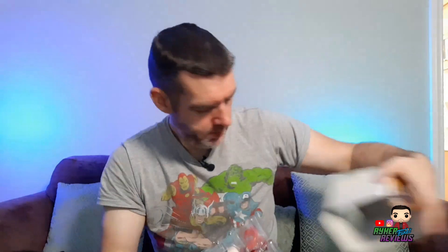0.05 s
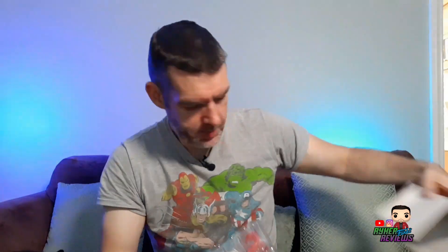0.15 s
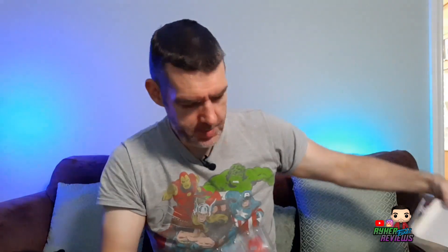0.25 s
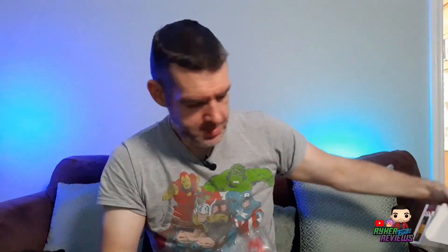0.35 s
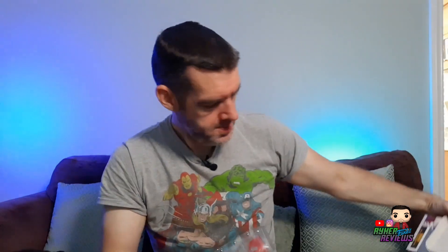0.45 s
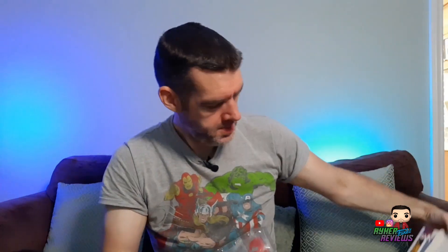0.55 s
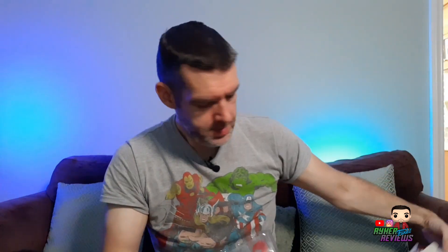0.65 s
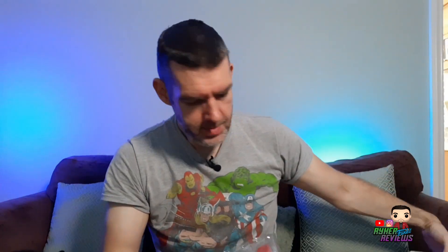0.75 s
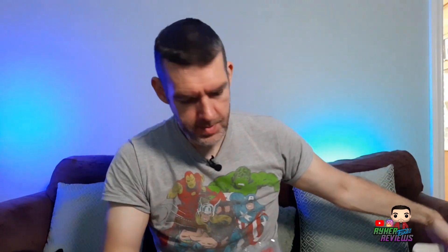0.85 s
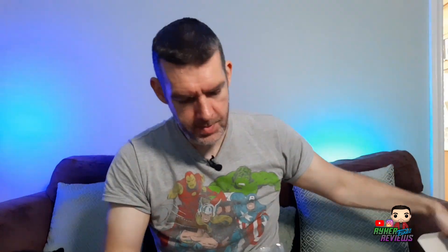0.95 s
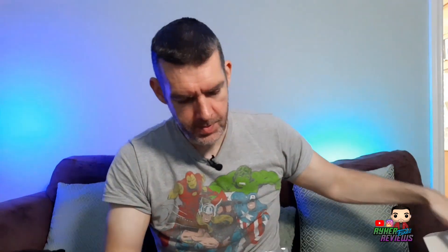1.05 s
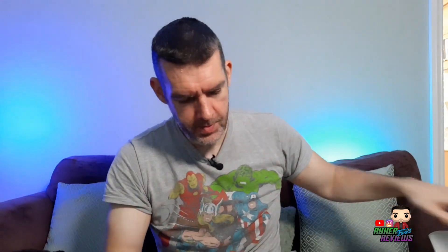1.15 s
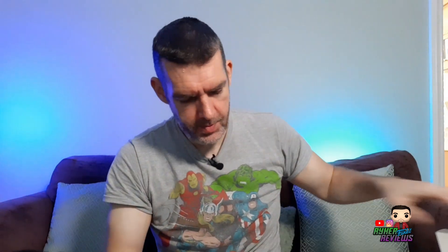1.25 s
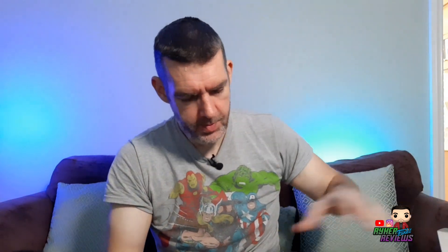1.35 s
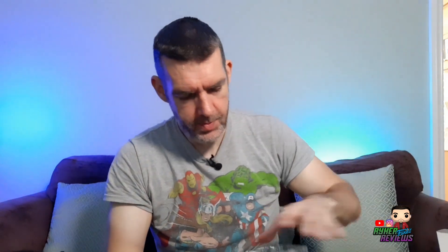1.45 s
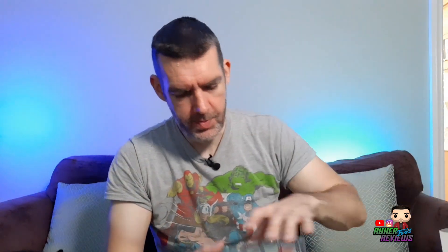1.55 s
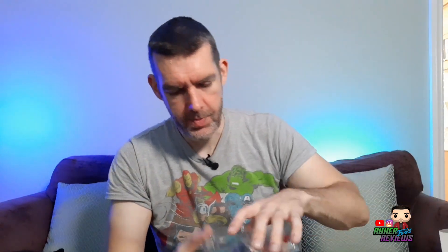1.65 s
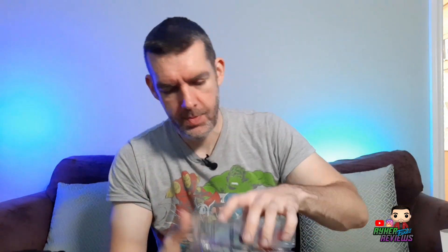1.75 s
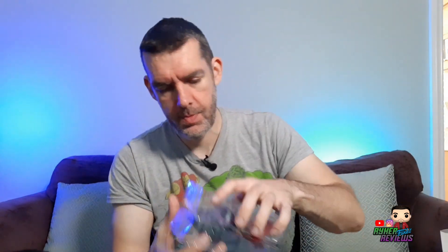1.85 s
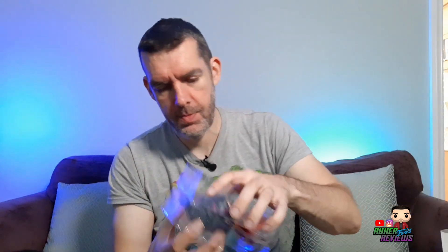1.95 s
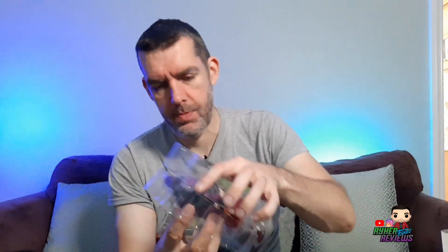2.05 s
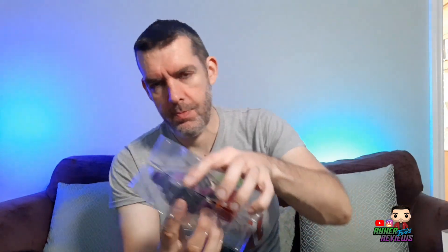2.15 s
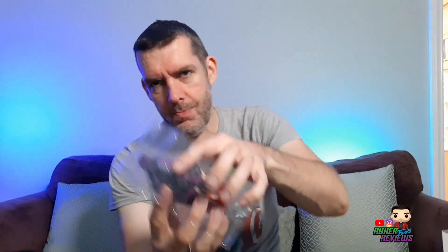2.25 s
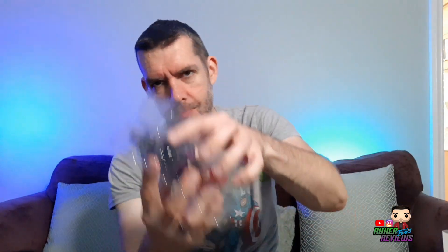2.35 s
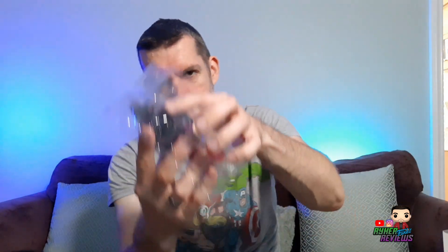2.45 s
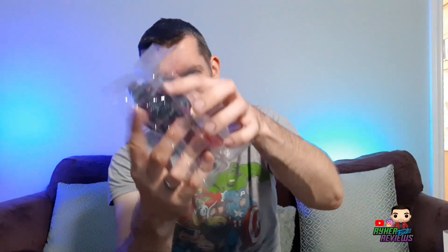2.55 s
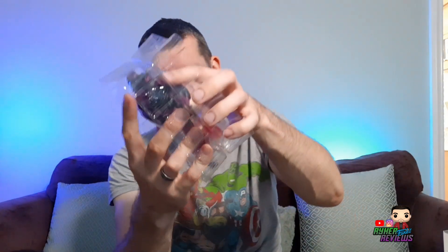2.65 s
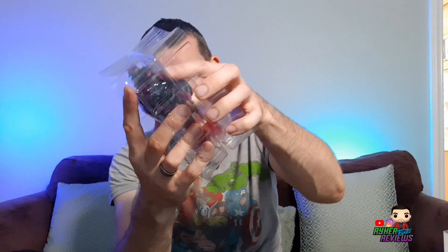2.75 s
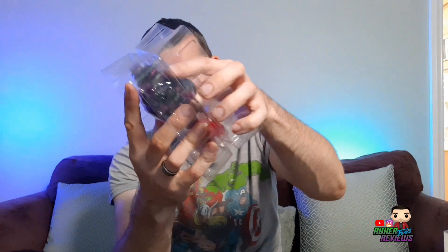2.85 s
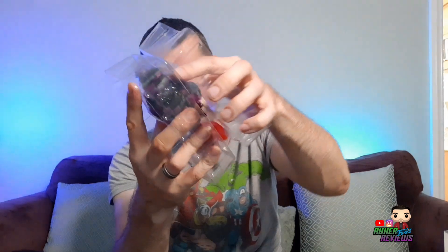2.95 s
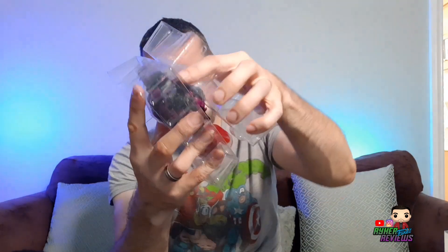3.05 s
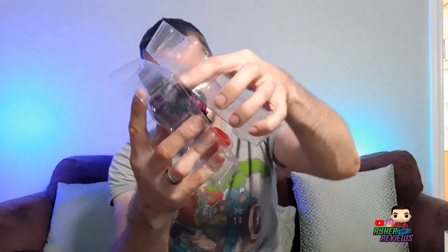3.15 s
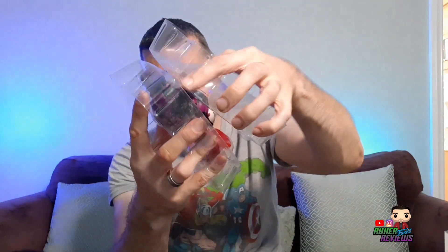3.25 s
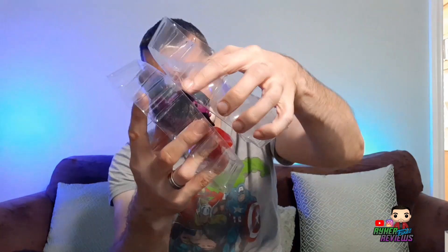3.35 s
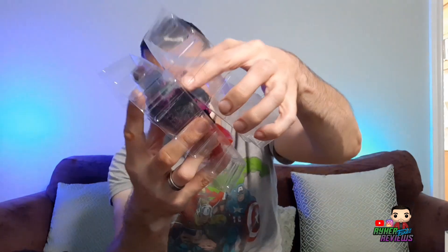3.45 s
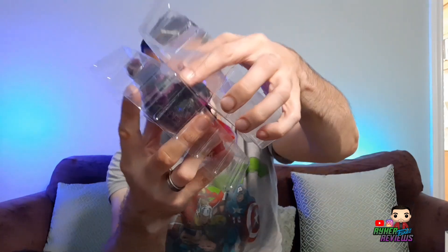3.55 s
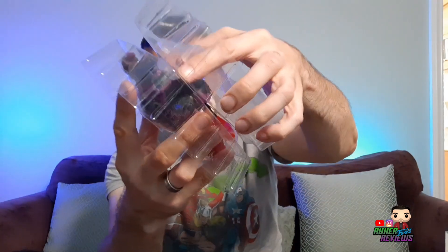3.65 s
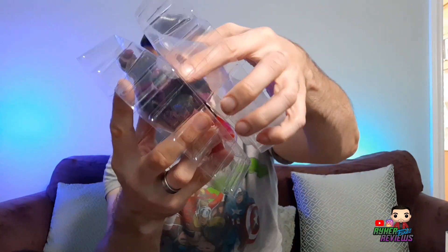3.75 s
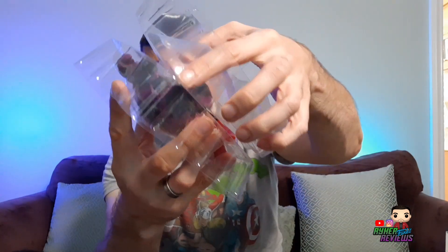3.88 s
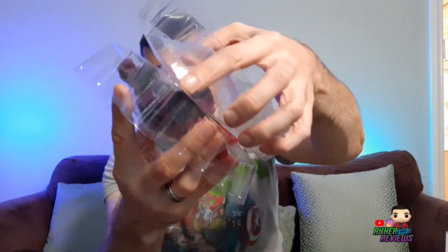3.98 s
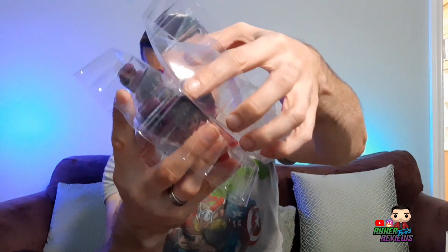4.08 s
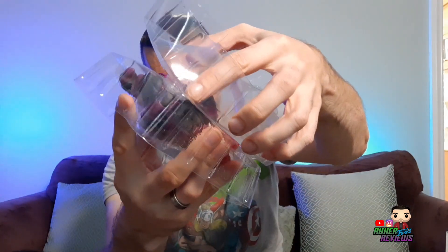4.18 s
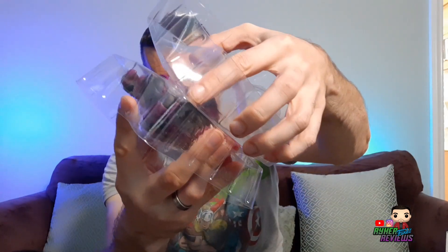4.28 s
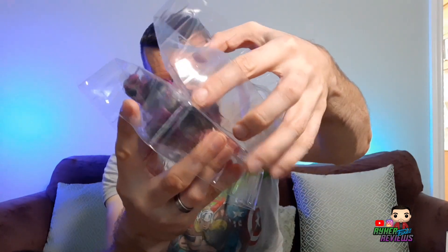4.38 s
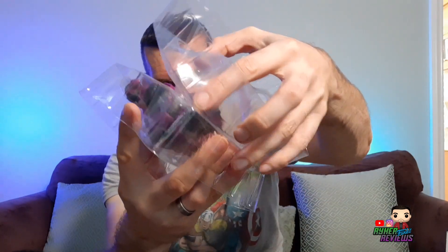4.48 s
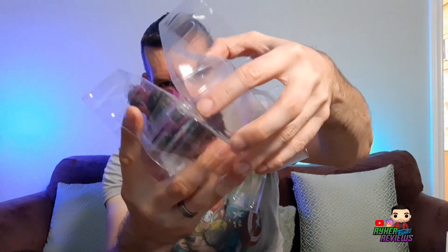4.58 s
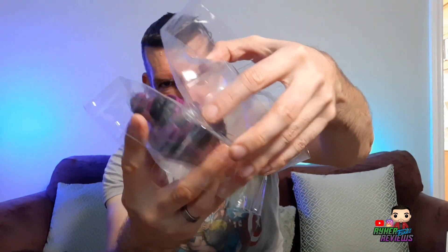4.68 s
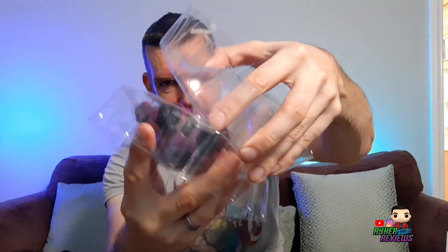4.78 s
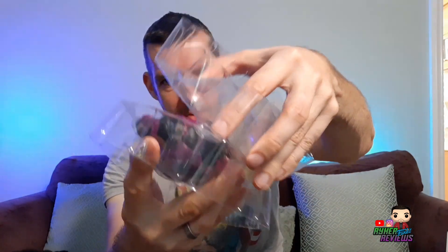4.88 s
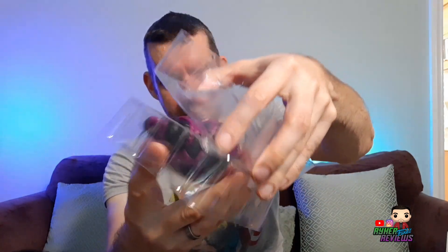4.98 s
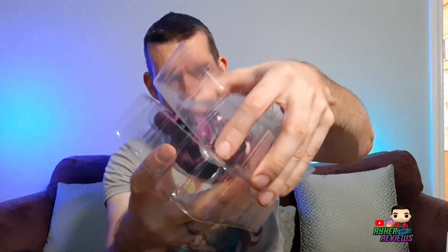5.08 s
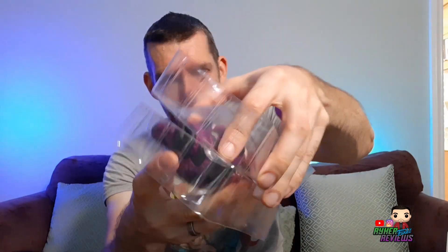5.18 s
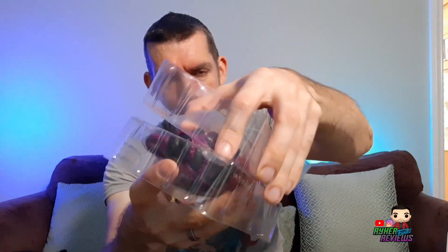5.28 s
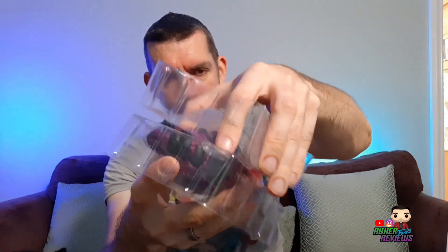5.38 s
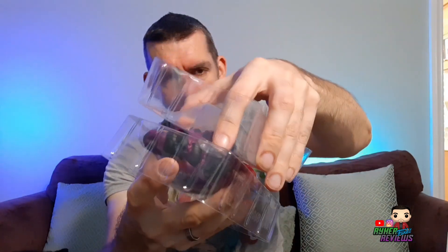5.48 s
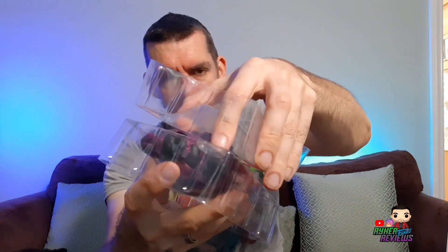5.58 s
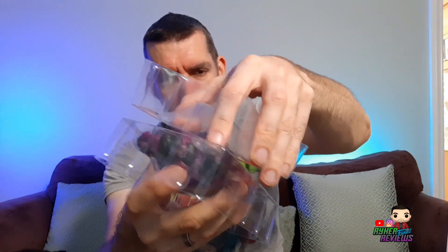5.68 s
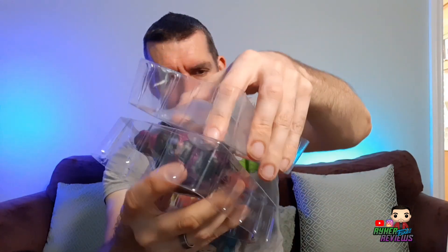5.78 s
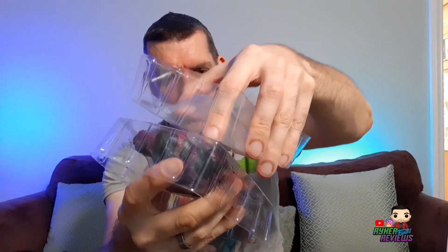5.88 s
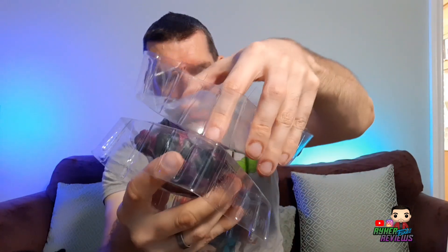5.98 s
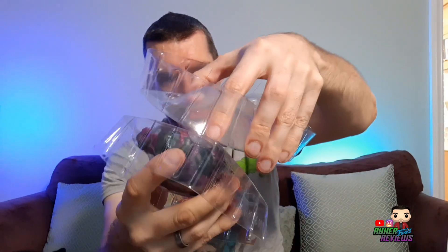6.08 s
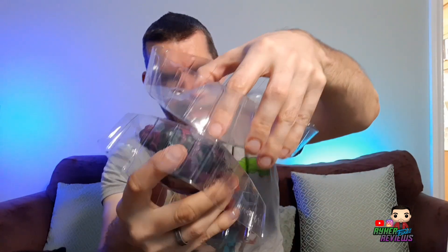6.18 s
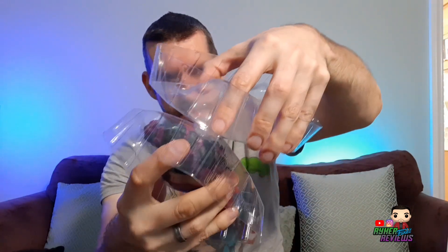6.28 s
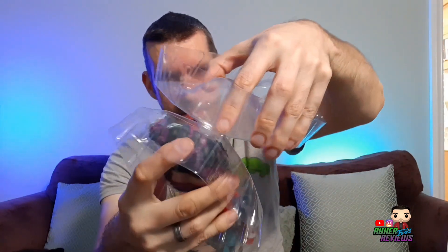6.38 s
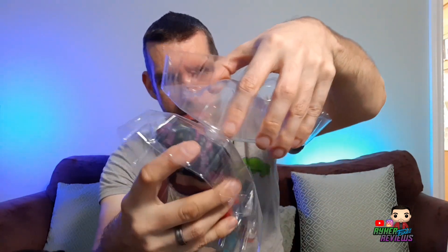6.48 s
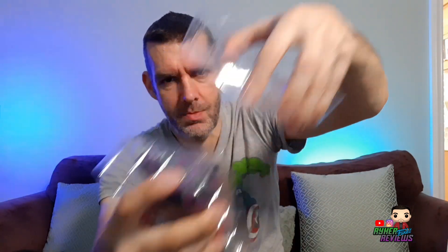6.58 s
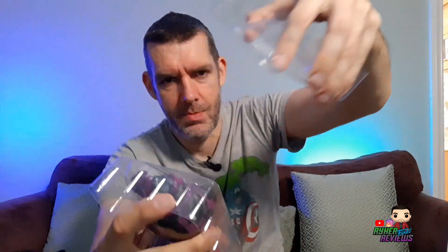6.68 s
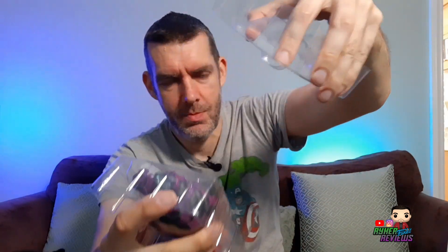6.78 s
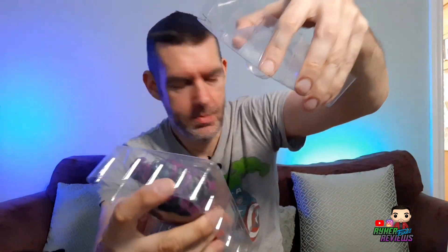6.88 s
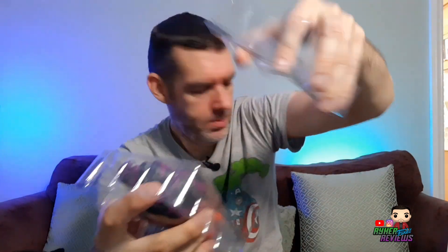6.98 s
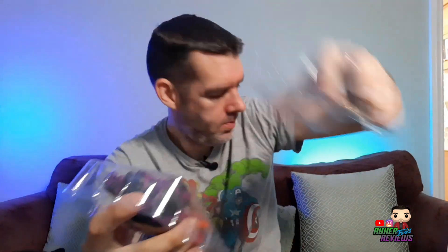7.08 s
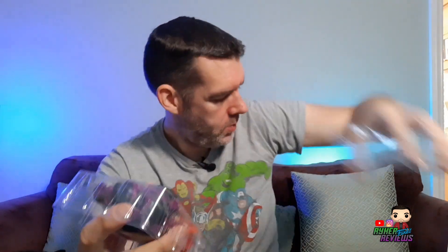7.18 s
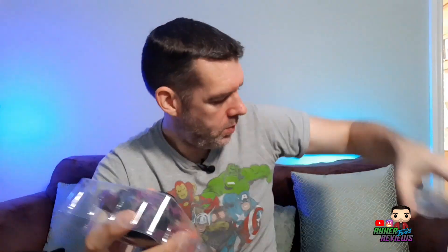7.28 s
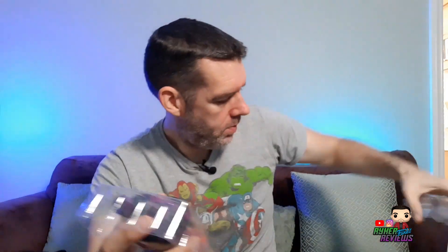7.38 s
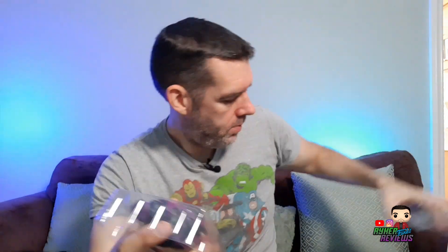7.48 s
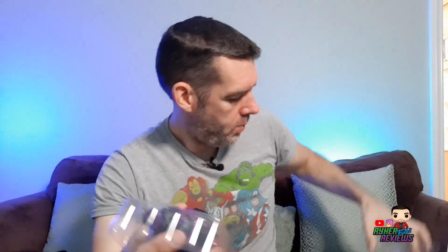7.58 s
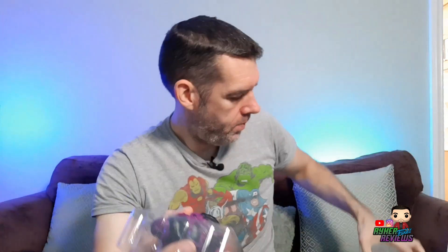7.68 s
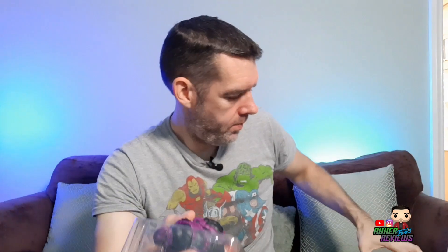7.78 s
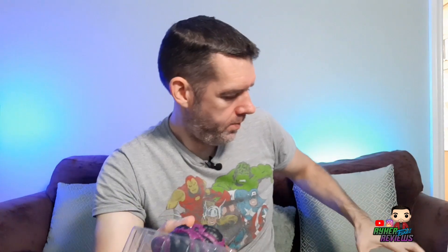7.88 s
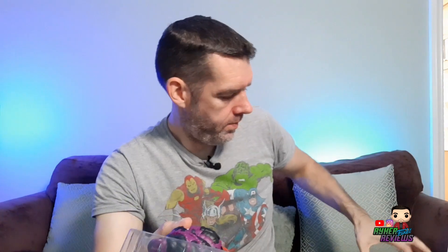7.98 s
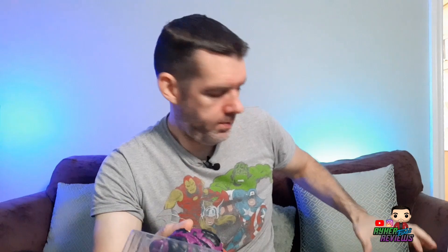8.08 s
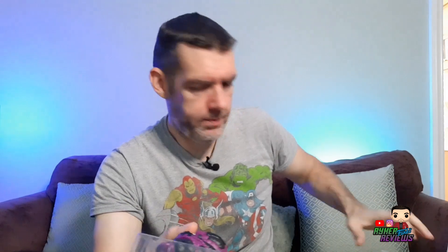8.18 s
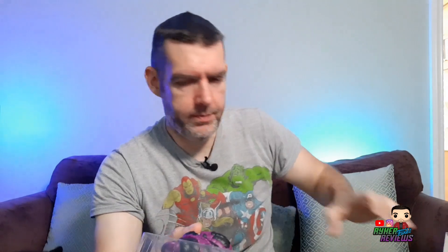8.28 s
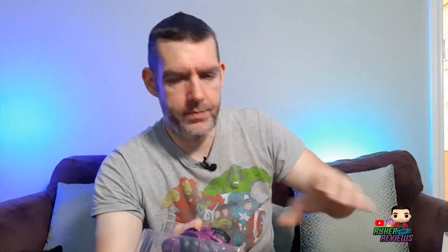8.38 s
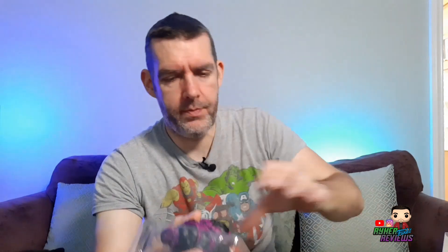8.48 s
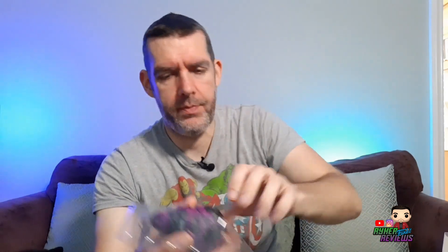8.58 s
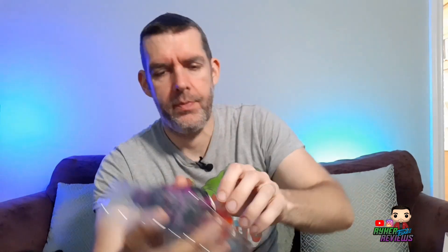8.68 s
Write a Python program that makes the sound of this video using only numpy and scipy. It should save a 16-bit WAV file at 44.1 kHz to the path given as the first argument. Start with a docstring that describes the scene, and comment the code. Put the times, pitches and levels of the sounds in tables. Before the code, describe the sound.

In a small furnished room, a light box is set down with faint taps and soft thuds. Hands then grip a stiff plastic shell close to the microphone: rustle and hollow creaks grow into hard, bright, irregular snaps, ease a little, build again and end in one loud pop. After a near-silent gap, duller bumps and rustling come from the sofa.

```python
"""A stiff clear plastic tray is prised apart close to a microphone: sharp snaps and creaks, then one loud pop.
Each snap is a burst of noise through a body's colour, with a note of the bending panel and a ping of the wall.
A cardboard box and the loose lid add thuds and taps on a sofa; hands rustle as crackling, coloured noise.
A small furnished room adds echoes, over a quiet hush of noise. A peak limiter holds the loudest sounds."""
import sys
import numpy as np
from scipy import signal
from scipy.io import wavfile
from scipy.ndimage import uniform_filter1d, minimum_filter1d

SR = 44100
rng = np.random.default_rng(int(sys.argv[2]) if len(sys.argv) > 2 else 0)


def transcribe(signal):
    """Save signal, clipped to [-1, 1], as a 16-bit WAV file at the path in sys.argv[1]."""
    frames = np.atleast_2d(signal).T
    limited = np.clip(frames, -1, 1)
    pcm = np.round(limited * 32767).astype(np.int16)
    wavfile.write(sys.argv[1], SR, pcm)


N = 385434

# clear buckles of the plastic shell: (time [s], bright tick [dB], hollow body over the tick, before a trim [dB])
SNAPS = [(1.533, -30.5, -5), (1.6512, -14.5, 2), (1.6561, -25.5, 12), (1.673, -26, -1), (1.697, -29, 2),
         (1.7295, -20, 0), (1.7398, -16, 3), (1.8336, -23, 0), (1.872, -29, 5.5), (2.0224, -24, 3.5),
         (2.2167, -32, 1), (2.249, -25, -21), (2.2731, -22, -6), (2.308, -20, -3), (2.3212, -21, -4),
         (2.352, -19.5, -7.5), (2.393, -24.5, -26), (2.404, -25, 5), (2.482, -35.5, 5),
         (2.5635, -28.5, 0.5), (2.6104, -19.5, -6.5), (2.6507, -20, -4), (2.6652, -18, -7),
         (2.6731, -22, -2), (2.6952, -25.5, 2.5), (2.714, -30, -1.5), (2.926, -25, -6), (2.9135, -35, -6.5),
         (2.9545, -17, -2.5), (2.9886, -14.5, -6), (3.0293, -12.5, -7), (3.0943, -23.5, -2.5),
         (3.176, -17, -13.5), (3.225, -9, -4.5), (3.2825, -10.5, -6.5), (3.3857, -19.5, -4.5),
         (3.4114, -18, -6), (3.4289, -6, -6.5), (3.4671, -11, -2), (3.5722, -21.5, -3.5),
         (3.598, -11, -5.5), (3.678, -21, -3.5), (3.7135, -10, -6.5), (3.7471, -19, -13), (3.825, -9, -8),
         (3.8861, -7, -3), (4.041, -5.5, -7), (4.0612, -14, -4), (4.0791, -11, -15.5), (4.0986, -10.5, -5),
         (4.2022, -6.5, -10), (4.3501, -9, -5.5), (4.3721, -23.5, -8), (4.4038, -16, -9.5),
         (4.468, -29, -14), (4.5133, -34, -6), (4.5343, -26.5, 4), (4.5436, -8, -7), (4.6275, -26, -8.5),
         (4.6455, -28, -1), (4.6643, -37.5, 4), (4.7857, -33, 4), (4.8189, -14.5, -8),
         (4.8856, -14.5, -1.5), (4.966, -18.5, -15), (4.98, -23, -4), (4.995, -19.5, -2.5),
         (5.0126, -14.5, -11.5), (5.0246, 0.5, -13.5), (5.0348, -32.5, -14), (5.0417, -5.5, -5.5),
         (5.048, -18.5, -1.5), (5.057, -21.5, -6.5), (5.0702, -15, -4), (5.082, -13, -5), (5.1007, -14, -7),
         (5.1368, -19, -1), (5.1926, -30, -4), (5.2022, -33, -3), (5.2308, -30, -6), (5.2621, -27, -8),
         (5.3189, -17, -18), (5.342, -25, -2.5), (5.3548, -23, -2), (5.3663, -21.5, -4),
         (5.3729, -22, -11.5), (5.3801, -24.5, 3), (5.391, -23, -8), (5.3989, -27, -2.5),
         (5.4505, -19, -10), (5.4614, -24, -5), (5.499, -17.5, -6.5), (5.5107, -21.5, -6.5),
         (5.6261, -38.5, 8), (5.7346, -24.5, -4), (5.7548, -27, -4.5), (5.7845, -14.5, -10.5),
         (5.8037, -16.5, -9.5), (5.833, -24.5, -2), (5.8451, -13.5, -13), (5.8568, -20, 1),
         (5.8958, -15, -3.5), (5.9161, -14.5, -8), (6.005, -10.5, -8), (6.0237, -15.5, -3),
         (6.054, -12.5, -6), (6.155, -32, -6), (6.1642, -24, -3), (6.1878, -35, -12), (6.2042, -7, -5.5),
         (6.2276, -12, -7), (6.2904, -11, -5), (6.3338, -12.5, -3.5), (6.3929, -9.5, -2),
         (6.4253, -10.5, 1), (6.4493, -11, -8.5), (6.4711, -10.5, -1), (6.4933, -13.5, -10.5),
         (6.528, -14.5, 8), (6.5353, -10, -4.5)]
# colour of the tick, from the thin wall: (frequency [Hz], level [dB])
TICK_COLOUR = [(1500, -38), (2700, -17), (3400, -3.5), (4400, 1.5), (5900, 1), (7400, -7.5), (11500, -11),
               (16000, -20.5)]
# colour of the hollow body, from the tray cavity: (frequency [Hz], level [dB])
HOLLOW_COLOUR = [(50, -40), (150, -16.5), (340, -10), (450, -13), (730, -1.5), (860, -0.5), (1030, -1),
                 (1200, -0.5), (1450, -3), (2300, -6), (3500, -14.5), (8000, -48)]
# note of the panel that bends, which changes as the grip moves: (from time [s], pitch [Hz])
PANEL_NOTES = [(0, 760), (2.9, 840), (2.98, 1730), (3.02, 1390), (3.2, 780), (3.55, 1420), (3.87, 760),
               (4.03, 1513), (4.19, 1250), (4.34, 1005), (4.8, 1180), (5.0, 892), (5.6, 1220), (5.7, 960),
               (5.99, 1450), (6.04, 1150), (6.19, 1000), (6.52, 2080)]
# the wall pings more as the open tray faces the microphone: (time [s], ping over the tick [dB])
FACING = [(1.5, -24), (2.2, -18), (3.0, -10.5), (4.0, -1.5), (5.0, 1), (5.8, 5.5), (6.5, 2.5)]
# the two halves let go: (time [s], level [dB])
POP = [(6.5411, 6.5)]
# colour of the whole tray: (frequency [Hz], level [dB])
POP_COLOUR = [(60, -42.5), (260, -19.5), (480, -19.5), (730, 0), (1700, -7), (2500, -12), (3600, -8),
              (5200, -6.5), (7000, -8.5), (10000, -19.5), (16000, -46)]
# box and lid touch the sofa and each other: (time [s], tick [dB], thud over the tick [dB])
KNOCKS = [(0.0615, -52, 7.5), (0.239, -37, -1.5), (0.5269, -52, 4), (0.546, -39, -1.5), (0.6359, -35, -6.5),
          (0.7189, -39.5, 7.5), (0.7538, -34, 11), (0.8275, -31.5, -1), (0.856, -40, -18),
          (0.9385, -36, -3), (1.109, -48.5, 7), (1.146, -32, -3), (1.218, -45.5, 6.5), (1.2388, -47.5, 5),
          (1.34, -57, 14.5), (1.3905, -54.5, 12.5), (1.415, -74, -10), (1.427, -39.5, 1),
          (1.4411, -61, -16), (6.9633, -64, -15), (6.9783, -63.5, -11), (7.1675, -53.5, 2),
          (7.403, -56, -1), (7.4442, -36, -1), (7.561, -51.5, -1.5), (7.588, -61.5, -12),
          (7.7592, -50.5, -11), (7.7845, -44, 0), (7.821, -26.5, 10), (7.8606, -39.5, 15.5),
          (7.931, -45, 15), (8.0163, -47.5, 12.5), (8.0608, -35, -2), (8.073, -26, 0), (8.125, -27, 10),
          (8.146, -36, 11.5), (8.1763, -31, 6.5), (8.218, -30, 9), (8.229, -25.5, 5), (8.2505, -35, 10),
          (8.2907, -35, 6), (8.3151, -22, 7), (8.4105, -34.5, 12.5), (8.423, -23, 1.5),
          (8.535, -49.5, 20.5), (8.662, -48, -3), (8.728, -41.5, 3.5)]
# colour of the card edge: (frequency [Hz], level [dB])
TAP_COLOUR = [(600, -45.5), (1600, 7), (3000, 5), (6000, -3), (10000, -8.5), (16000, -27)]
# colour of card on a cushion: (frequency [Hz], level [dB])
THUD_COLOUR = [(30, -40), (90, -12), (170, -2.5), (300, 0), (600, -1), (950, -0.5), (1700, -16),
               (3000, -23), (8000, -44.5)]
# moves of the hands over card, cloth or plastic: (start [s], hold [s], rustle [dB],
# brightness above 800 Hz [dB per octave], creaks of the shell [dB])
MOVES = [(0, 0.13, -59.5, -2, -90), (0.651, 0.079, -52.5, 2, -90), (0.866, 0.076, -51, 1, -90),
         (1.243, 0.16, -69.5, 4, -90), (1.598, 0.054, -43.5, -2, -45), (1.662, 0.058, -30, -4, -32.5),
         (1.846, 0.27, -46, -3, -46), (2.242, 0.16, -41.5, -1.5, -39), (2.585, 0.083, -46, 0.5, -38.5),
         (2.804, 0.17, -59.5, -5, -54), (4.482, 0.09, -47, 0, -43), (4.786, 0.34, -45, 0, -40.5),
         (5.287, 0.1, -48, -0.5, -39), (5.753, 0.87, -54.5, 1.5, -45.5), (7.155, 0.13, -73, -1, -90),
         (7.42, 0.024, -64.5, 0, -90), (7.807, 0.24, -48.5, -4, -90), (8.13, 0.4, -42.5, -3.5, -90)]
# basic colour of the rustle: (frequency [Hz], relative level [dB])
RUSTLE_COLOUR = [(30, -15.5), (60, -11.5), (120, 1), (300, 4), (800, 9.5), (2000, -5), (5000, -6),
                 (10000, -15.5), (16000, -22)]
# near reflections, from table and wall: (delay [s], level [dB])
ECHOES = [(.0075, -18), (0.024, -29)]
# the room's tail; the tick beams at the microphone, so less of its 5 kHz peak reaches the walls:
# (frequency [Hz], time to fade by 60 dB [s], level [dB])
ROOM = [(120, 0.42, 1.5), (330, 0.22, 1.5), (854, 0.23, -1), (2230, 0.26, 1.5), (5300, 0.23, -7),
        (7900, 0.23, -2.5), (14000, 0.19, 2.5)]
# colour of the background noise: (frequency [Hz], relative level [dB])
HUSH_COLOUR = [(15, -42.5), (25, -11.5), (105, 1.5), (1160, -13), (1480, -9), (1890, -18.5), (2050, -18.5),
               (4870, -18.5), (16000, -22.5)]

RISE_DB_PER_S, FALL_DB_PER_S = 408, 116.5  # how fast each move swells and fades


def shell():
    """A buckle gives a bright tick and a panel note; the tray's hollow answers with a slower rise."""
    rows = np.vstack([SNAPS, creaks(count=450)])
    s, db, body_db = rows.T
    tick = ring(TICK_COLOUR, s, db, rise=0.0002, t60=0.013, first=6.8)
    hollow = ring(HOLLOW_COLOUR, s, db + body_db - 1.0, rise=0.00049, t60=0.029, first=5.3)
    return tick + hollow + panel(s, db, body_db)


def creaks(count):
    """Small buckles at random moments while the shell is held, as loud as the hands' moves allow."""
    held_from, held_to = 1.55, 6.53  # s
    spread_db, hollow_db = 4, 1  # spread of sizes; middle of the hollow over the tick
    when, size, hollow = rng.random((count, 3)).T
    s = held_from + (held_to - held_from) * when
    hand_db = (moves(s) + np.transpose(MOVES)[-1][:, None]).max(0)
    db = hand_db - spread_db * np.log(np.maximum(size, 0.05))
    return np.transpose([s, db, hollow_db + 12 * (hollow - 0.5)])


def panel(s, db, body_db):
    """The bending panel rings a little off its note each time, and the thin wall pings at varied pitch."""
    since, note_hz = np.transpose(PANEL_NOTES)
    off, ping = rng.standard_normal((len(s), 2)).T
    hz = note_hz[np.searchsorted(since, s) - 1] * (1 + 0.031 * off)
    low = notes(s, hz, db + body_db - 3, t60=0.033, wall_db=-6.5)
    ping_hz = 5000 + 650 * ping
    ping_db = db + np.interp(s, *np.transpose(FACING))
    return low + notes(s, ping_hz, ping_db, t60=0.008, wall_db=-12.5)


def notes(s, hz, db, t60, wall_db):
    """One short dying sine at each time, toward the microphone and, by wall_db, into the room."""
    t = np.arange(4000) / SR
    out = np.zeros(N)
    for at, pitch_hz, level_db in zip(s, hz, db):
        fade = gain_of(level_db - 60 * t / t60)
        add(out, at, fade * np.sin(2 * np.pi * pitch_hz * t))
    out = signal.lfilter(*signal.butter(2, 300, "high", fs=SR), out)
    return out * gain_of([[0], [wall_db]])


def pop():
    """The whole rim lets go at once, a very sharp burst through the colour of the tray."""
    s, db = np.transpose(POP)
    return ring(POP_COLOUR, s, db, rise=0.00005, t60=0.022, first=7.0)


def ring(colour, s, level_db, rise, t60, first):
    """Each event is one sharp crack and a short run of smaller ones, exciting a body of this colour."""
    log_gain = np.log(gain_of(read(colour, abs(np.fft.fftfreq(4096, 1 / SR)))))
    # this phase makes the body sound only after it is struck
    body = np.fft.ifft(np.exp(log_gain - 1j * signal.hilbert(log_gain).imag)).real[:2048]
    t = np.arange(2000) / SR
    envelope = (1 - np.exp(-t / rise)) * gain_of(-60 * t / t60)
    cracks = rng.standard_normal((len(s), len(t))) * envelope
    cracks[:, round(rise * SR)] += first * np.sign(cracks[:, 1])
    sounds = signal.fftconvolve(cracks, body[None], axes=1)
    loudest = np.sqrt(uniform_filter1d(sounds ** 2, size=60, axis=1).max(1))
    out = np.zeros((2, N))  # toward the microphone; into the room
    for at, db, sound, top in zip(s, level_db, sounds, loudest):
        add(out[0], at, gain_of(db) * sound / top)
        # over all directions the sound is smoother: the bare body at the same energy
        smooth = body * np.linalg.norm(sound) / np.linalg.norm(body)
        add(out[1], at, gain_of(db) * smooth / top)
        # part of this event's own colour also reaches the walls
        add(out[1], at, gain_of(db - 6.0) * sound / top)
    return out


def knocks():
    """A dull thud of card or cushion with a small tick at the contact."""
    s, db, thud_db = np.transpose(KNOCKS)
    tap = ring(TAP_COLOUR, s, db, rise=0.00033, t60=0.018, first=5.0)
    thud = ring(THUD_COLOUR, s, db + thud_db, rise=0.00073, t60=0.031, first=3.2)
    return tap + thud


def rustle():
    """Dense tiny crackles of uneven size over a sliding hiss, with its own brightness for each move."""
    hz = np.fft.rfftfreq(512, 1 / SR)[:, None]
    t = np.arange(N // 128 + 2) * 128 / SR
    happens = rng.random(N) < 500 / SR  # about 500 crackles a second
    size = gain_of(4.0 * np.minimum(rng.exponential(1, N), 3)) * happens
    grain = np.exp(-np.arange(200) / 25)
    crackle = evened(signal.oaconvolve(size, grain)[:N])
    drive = rng.standard_normal(N) * (0.5 + crackle)
    db, tilt_db = np.transpose(MOVES)[2:4]
    tilt_db = np.append(tilt_db, 0)  # the last one is the steady hiss at rest
    colour = read(RUSTLE_COLOUR, hz) + tilt_db * np.log2(np.maximum(hz, 800) / 800)
    band = (hz[:, 0] > 200) & (hz[:, 0] < 3000)  # power of the mid band sets the level
    share_db = 10 * np.log10((gain_of(colour[band]) ** 2).sum(0) / len(hz))
    rest_db = -83.5
    level_db = np.vstack([moves(t) + db[:, None], rest_db + 0 * t])
    power = gain_of(colour - share_db) ** 2 @ gain_of(level_db) ** 2
    return shaped(evened(drive), 10 * np.log10(power))


def moves(t):
    """Every move of the hands swells quickly, holds and fades more slowly: dB under its top."""
    start, hold = np.transpose(MOVES)[:2, :, None]
    swell_db = -RISE_DB_PER_S * np.maximum(start - t, 0)
    fade_db = -FALL_DB_PER_S * np.maximum(t - start - hold, 0)
    return swell_db + fade_db


def room(x, spread):
    """Near reflections, then sparse taps of random sign; three tails take turns so like snaps differ."""
    near = np.zeros(SR // 20)
    near[0] = 1
    for s, db in ECHOES:
        near[round(s * SR)] = gain_of(db)
    taps = np.zeros((3, SR // 2))
    slots = np.arange(300, SR // 2 - 20, 12)
    at = slots + rng.integers(0, 12, (3, len(slots)))
    np.put_along_axis(taps, at, rng.choice([-1., 1.], at.shape), 1)
    hz, t, z = signal.stft(taps, SR, nperseg=256)
    t60 = read(ROOM, hz)[:, None]
    colour_db = read(ROOM, hz, axis=2)[:, None]
    tails = signal.istft(z * gain_of(colour_db - 60 * t / t60), SR, nperseg=256)[1]
    turn = np.arange(N) / SR * 13 + np.arange(3)[:, None] * 2 * np.pi / 3  # 13 radians a second
    shares = spread * np.cos(turn) * np.sqrt(2 / 3)
    wet = signal.fftconvolve(shares, tails / np.linalg.norm(tails[0]), axes=1)
    return signal.oaconvolve(x, near)[:N], wet.sum(0)[:N]


def hush():
    """The quiet room and the microphone's own noise, as steady coloured noise."""
    hz = np.fft.rfftfreq(512, 1 / SR)[:, None]
    noise = shaped(rng.standard_normal(N), read(HUSH_COLOUR, hz))
    return gain_of(-70.5) * evened(noise)


def shaped(x, db):
    """Colours x by a dB field over frequency bins and time frames."""
    z = signal.stft(x, nperseg=512, noverlap=384)[2]
    return signal.istft(z * gain_of(db), nperseg=512, noverlap=384)[1][:N]


def gain_of(db):
    """Turns decibels into gain."""
    return 10 ** (np.asarray(db) / 20)


def evened(x):
    """Scales to an rms of 1."""
    return x / np.sqrt(np.mean(x ** 2) + 1e-20)


def read(points, hz, axis=1):
    """Reads a column of a spectrum on a log-frequency axis."""
    table = np.transpose(points)
    return np.interp(np.log(hz + 1), np.log(table[0] + 1), table[axis])


def add(mix, s, sound):
    """Mixes a sound in at time s, in seconds."""
    part = mix[round(s * SR):][:len(sound)]
    part += sound[:len(part)]


def scene():
    """All sources share the room, each with its own amount of tail, over the hush."""
    mix = hush()
    both_ways = rustle() * np.ones((2, 1))  # the same toward the microphone and into the room
    # what lies on the sofa is farther and wetter than the shell
    for sound, wet_db in (shell(), -7), (pop(), 3), (knocks(), -3), (both_ways, -3):
        near, tail = room(*sound)
        mix = mix + near + gain_of(wet_db) * tail
    return mix[None]


def top_cut(x):
    """Nothing passes above the cut-off."""
    return signal.sosfilt(signal.butter(12, 16980, fs=SR, output="sos"), x)


def record(dry):
    """A limiter that looks a moment ahead and lets go steadily, then a cut of the highest treble."""
    over_db = np.maximum(20 * np.log10(abs(dry[0]) + 1e-9) + 0.33, 0)
    fall = np.arange(N) * 570.0 / SR  # lets go by 570 dB a second
    held_db = np.maximum.accumulate(over_db + fall) - fall
    ahead_db = -minimum_filter1d(-held_db, size=41)  # the highest cut within 41 samples
    cut_db = uniform_filter1d(ahead_db, size=41)
    held = np.clip(dry / gain_of(cut_db), -1, 1)
    low_pass = signal.firwin(255, 16450, window=("kaiser", 8), fs=SR)  # edge in Hz
    mix = signal.oaconvolve(held, low_pass[None], "same")
    return top_cut(mix)


dry = scene()
out = record(dry)
transcribe(out)
```